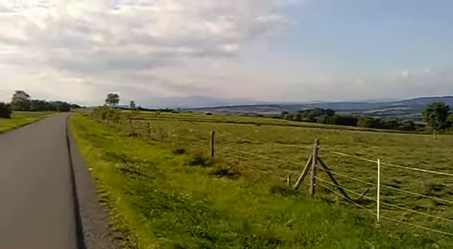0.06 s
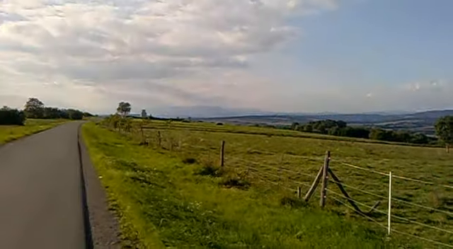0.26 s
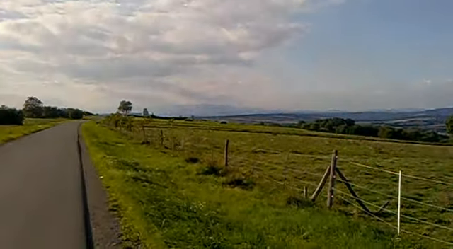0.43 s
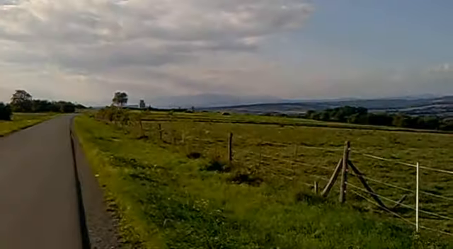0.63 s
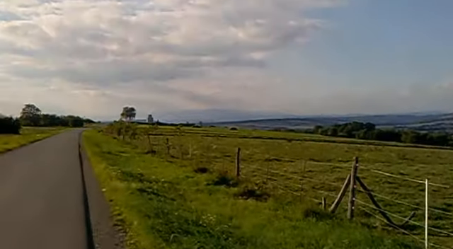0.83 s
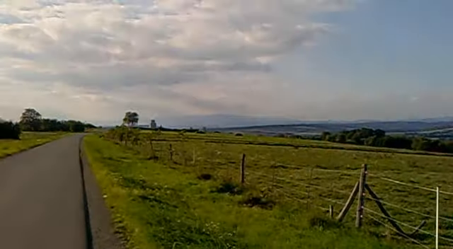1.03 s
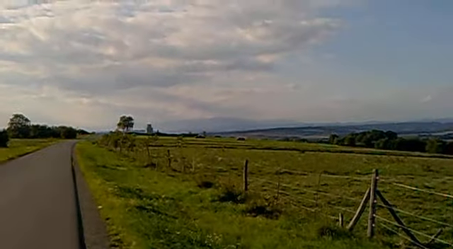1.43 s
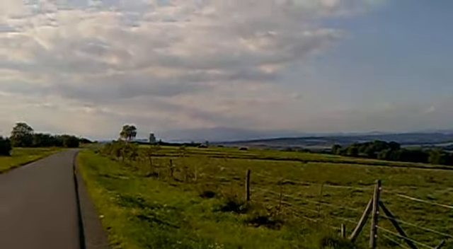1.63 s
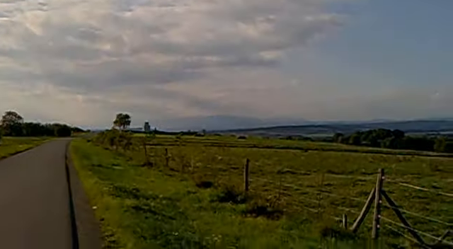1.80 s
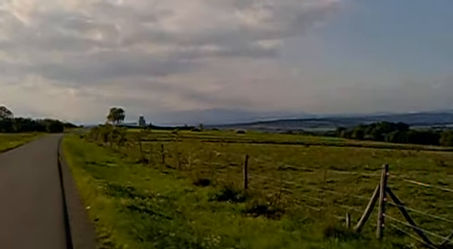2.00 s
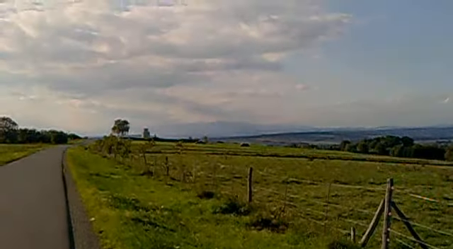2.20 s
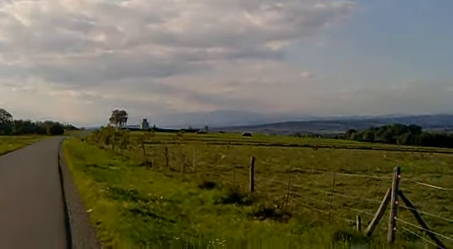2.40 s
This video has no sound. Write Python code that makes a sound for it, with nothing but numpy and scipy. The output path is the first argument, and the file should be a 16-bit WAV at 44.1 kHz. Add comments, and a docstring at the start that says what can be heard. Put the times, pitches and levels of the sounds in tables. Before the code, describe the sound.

Sharp ticks and dull knocks on a handheld microphone over low wind rumble.

```python
"""Beside a country road, wind buffets a hand-held microphone over the faint rush of open fields.
Turbulence at the microphone gives a deep rumble and, in strong gusts, a quicker flutter.
Small hard contacts close by, probably the casing being handled, give ringing ticks and dull knocks,
and sliding friction gives a few brief rubs. Each contact travels as a bending wave, which is
dispersive: its treble arrives a moment before its bass."""
import sys
import numpy as np
from scipy import signal
from scipy.fft import rfft, irfft
from scipy.io import wavfile
from scipy.ndimage import uniform_filter1d

SR = 44100
rng = np.random.default_rng(int(sys.argv[2]) if len(sys.argv) > 2 else 0)


def output_pcm(signal):
    """Save a mono or channel-first signal as 16-bit PCM at the path in sys.argv[1].

    Samples are clipped to [-1, 1] before scaling.
    """
    pcm = np.clip(np.atleast_2d(signal).T, -1, 1) * 32767
    wavfile.write(sys.argv[1], SR, np.round(pcm).astype(np.int16))


N = 112454


def from_db(db):
    """Amplitude ratio of a level in decibels."""
    return 10 ** (np.asarray(db) / 20)


def band(x, low_hz, high_hz, order=2):
    """Causal Butterworth band-pass."""
    high_hz = min(max(high_hz, low_hz + 10), SR / 2 - 10)
    return signal.sosfilt(signal.butter(order, [low_hz, high_hz], "band", fs=SR, output="sos"), x)


def resonate(x, modes, sign=-1):
    """Modal superposition: alternating signs fill the valleys between peaks, equal signs deepen them."""
    out = 0
    for k, (hz, width_hz, db) in enumerate(modes):
        radius = np.exp(-np.pi * width_hz / SR)
        feedback = [1, -2 * radius * np.cos(2 * np.pi * hz / SR), radius ** 2]
        mode = (1 - radius ** 2) / 2 * signal.lfilter([1, 0, -1], feedback, x)
        out = out + sign ** k * from_db(db) * mode
    return out


def noise(spectrum):
    """Spectral shaping: noise of rms 1 with the given colour, falling steeply above its last point."""
    hz, db = np.transpose(spectrum)
    f = np.maximum(np.fft.rfftfreq(N, 1 / SR), 1)
    gain = from_db(np.interp(np.log(f), np.log(hz), db)) / (1 + (f / hz[-1] / 2) ** 2) ** 2
    x = irfft(rfft(rng.standard_normal(N)) * gain, N)
    return x / x.std()


def eddies(spectrum, window_s=0.02):
    """Turbulence as noise divided by its running rms, so that the gusts alone set its envelope."""
    x = noise(spectrum)
    power = uniform_filter1d(abs(signal.hilbert(x)) ** 2 / 2, int(window_s * SR))
    return x / np.sqrt(power + 1e-9)


def wind():
    """Turbulent pressure on the microphone: a deep rumble, and a quicker flutter in strong gusts."""
    # gust envelopes: (time [s], relative rumble level [dB], relative flutter level [dB])
    gusts = [(0.0, -37.5, -69), (0.025, -51, -64.5), (0.09, -31, -36), (0.135, -48, -65),
             (0.158, -41, -34.5), (0.173, -20.5, -26), (0.209, -43.5, -60.5), (0.329, -37.5, -45.5),
             (0.339, -25, -33), (0.37, -25, -25), (0.408, -32, -31.5), (0.459, -41, -48),
             (0.551, -32.5, -52.5), (0.595, -29, -30.5), (0.613, -38, -63.5), (0.662, -32.5, -54),
             (0.695, -51.5, -50.5), (0.756, -30, -48), (0.816, -47.5, -63.5), (0.857, -38, -57.5),
             (0.901, -38.5, -68), (0.967, -50.5, -62), (1.001, -40.5, -61.5), (1.192, -44, -54),
             (1.235, -53.5, -65), (1.392, -37.5, -56), (1.42, -54.5, -60.5), (1.435, -36.5, -64.5),
             (1.489, -39.5, -39.5), (1.514, -32, -62.5), (1.564, -48, -73.5), (1.636, -35, -48),
             (1.697, -46.5, -69.5), (1.762, -35, -49.5), (1.828, -40.5, -56.5), (1.98, -48, -55),
             (2.071, -47, -49),(2.103, -37, -49.5), (2.18, -38.5, -42), (2.205, -47, -62),
             (2.372, -45, -49.5), (2.424, -37, -84), (2.442, -54.5, -56), (2.548, -45.5, -61.5)]
    # spectrum of the rumble: (frequency [Hz], relative density [dB])
    rumble_spectrum = [(15, -7), (28, 2.5), (45, 5), (80, 1), (115, -14), (170, -25.5), (300, -36.5)]
    # spectrum of the flutter: (frequency [Hz], relative density [dB])
    flutter_spectrum = [(70, -20), (120, 4.5), (160, 0), (230, -14), (350, -23.5), (600, -38.5),
                        (1200, -63.5)]
    times, rumble_db, flutter_db = np.transpose(gusts)
    t = np.arange(N) / SR
    rumble = from_db(np.interp(t, times, rumble_db) + 1) * eddies(rumble_spectrum)
    flutter = from_db(np.interp(t, times, flutter_db) - 1) * eddies(flutter_spectrum)
    return rumble + flutter


def fields(level_db=-68):
    """Stationary broadband noise: the far rush and hiss of open fields."""
    # ambient spectrum: (frequency [Hz], relative density [dB])
    spectrum = [(200, 9), (420, -5), (720, 7), (1050, -2.5), (1500, -7.5), (2200, -19), (4000, -18.5),
                (10000, -16.5), (16000, -11.5)]
    return from_db(level_db) * noise(spectrum)


def rubs():
    """Sliding friction: a grumble grows with speed, a hiss and the casing's modes with its square."""
    # slides: (start [s], swell [s], fade [s], peak grumble [dB], peak hiss [dB], peak sheen [dB])
    slides = [(0.051, 0.0066, 0.062, -56, -53, -65), (.07, 0.063, 0.19, -67, -69.5, -80),
              (0.214, 0.075, 0.018, -41, -54.5, -80), (1.271, 0.024, 0.065, -62, -61, -88.5)]
    # low friction noise: (frequency [Hz], relative density [dB])
    grumble_spectrum = [(120, -5.5), (300, 0), (480, 3), (900, -3.5), (1600, -22), (3000, -30.5)]
    # high friction noise: (frequency [Hz], relative density [dB])
    hiss_spectrum = [(1000, 0), (1600, 0.5), (3500, -6.5), (5000, -11), (7000, -14.5), (10000, -16.5),
                     (15000, -24)]
    # modes driven by friction: (frequency [Hz], bandwidth [Hz], relative gain [dB])
    sheen_modes = [(1560, 320, -1), (4740, 250, 6.5), (6500, 540, 3.5), (9100, 700, -24),
                   (12900, 2000, -22)]
    grumble, hiss = noise(grumble_spectrum), noise(hiss_spectrum)
    sheen = resonate(rng.standard_normal(N), sheen_modes, sign=1)
    sheen /= sheen.std()
    t = np.arange(N) / SR
    out = np.zeros(N)
    for start, swell, fade, grumble_db, hiss_db, sheen_db in slides:
        speed = np.interp(t, [start, start + swell, start + swell + fade], [0, 1, 0])
        out += speed * from_db(grumble_db) * grumble
        out += speed ** 2 * (from_db(hiss_db) * hiss + from_db(sheen_db) * sheen)
    return out


def contact_force(size, crunch_s, snap_db=-1, grit_db=-6, ripple_hz=1090):
    """Force spectrum of an impact: one clean impulse superposed on a crunch of tiny slips."""
    f = np.fft.rfftfreq(size, 1 / SR)
    age = np.arange(size) / SR / crunch_s
    slips = rfft(rng.standard_normal(size) * age * np.exp(-2 * age ** 2))
    # whitening leaves only spectral ripples finer than ripple_hz
    slips /= np.sqrt(uniform_filter1d(abs(slips) ** 2, int(ripple_hz / f[1])))
    snap = np.exp(-1j * np.pi * f * crunch_s)   # falls at the peak of the crunch
    return from_db(snap_db) * snap + from_db(grit_db) * slips


def contact(start, body, crack_db, crack_hz, sparkle_db, crunch_s, *hollows_hz):
    """Bending-wave dispersion: body sound, crack and high modes arrive with a delay ~ 1 / sqrt(f)."""
    # high modes of the casing: (frequency [Hz], bandwidth [Hz], relative gain [dB])
    sparkle_modes = [(5326, 450, -9), (6637, 400, -5), (8050, 350, -2.5), (8860, 948, 2), (12640, 860, -8)]
    crack_spread, delay_at_1khz_s, lead_samples = 1.375, 0.0018, 256
    hollow_relative_width, hollow_db = 0.15, -20.5
    click = signal.unit_impulse(len(body))
    crack = from_db(crack_db) * band(click, crack_hz / crack_spread, crack_hz * crack_spread)
    sparkle = from_db(sparkle_db) * resonate(click, sparkle_modes, sign=1)
    spectrum = rfft(body) + contact_force(len(body), crunch_s) * rfft(crack + sparkle)
    f = np.fft.rfftfreq(len(body), 1 / SR)
    dispersion = np.exp(-4j * np.pi * delay_at_1khz_s * np.sqrt(1000 * f))
    sound = np.roll(irfft(spectrum * dispersion), lead_samples)
    for hz in hollows_hz:   # modes with a node at the touched spot stay silent, leaving a hollow
        sound -= (1 - from_db(hollow_db)) * resonate(sound, [(hz, hz * hollow_relative_width, 0)])
    return np.pad(sound, (int(start * SR), N))[lead_samples:lead_samples + N]


def casing_ring(size=4096, low_cut_hz=515):
    """Impulse response of the casing's low modes, a sum of damped oscillations."""
    # low modes: (frequency [Hz], bandwidth [Hz], relative gain [dB])
    modes = [(659, 112, 5), (911, 218, -0.5), (1351, 220, -3.5), (1910, 454, -15.5)]
    ring = resonate(signal.unit_impulse(size), modes)
    return signal.sosfilt(signal.butter(2, low_cut_hz, "high", fs=SR, output="sos"), ring)


def ticks(ring):
    """Impulsive excitation: each hard tap sets the low modes ringing freely."""
    # taps: (time [s], ring gain [dB], crack gain [dB], crack centre [Hz], sparkle gain [dB],
    # crunch length [s], low hollow [Hz], high hollow [Hz])
    taps = [(0.055, -1, -11.5, 2400, -51, 0.00072, 1850, 3620),
            (0.1046, -22.5, -40, 3060, -48, 0.0016, 1880, 3800),
            (0.4416, 3, 9.5, 3913, -1, 0.00046, 1860, 6144),
            (0.7142, 4, -12.5, 2120, -49, 0.0011, 2500, 3520),
            (1.0416, 0, -2.5, 2660, -17.5, .00052, 920, 3680),
            (1.318, 4.5, -19.5, 3100, -45, .0015, 2760, 6040),
            (1.806, -1, -6.5, 2860, -26, 0.001444, 1580, 3720),
            (1.9955, -1, -28.5, 4040, -49.5, 0.00055, 2610, 5660),
            (2.3476, 2.5, -0.5, 2740, -27, 0.00045, 1550, 3920)]
    return sum(contact(start, from_db(db) * ring, *timbre) for start, db, *timbre in taps)


def knocks(ring, lag_s=0.00059, ring_db=-23.5):
    """Heavy damping: the casing gives way just after the crack in a dead thump that barely rings."""
    # blows: (time [s], thump gain [dB], crack gain [dB], crack centre [Hz], sparkle gain [dB],
    # crunch length [s], low hollow [Hz], high hollow [Hz])
    blows = [(0.14, -2, -35.5, 2920, -39, 0.0031, 1850, 6000),
             (0.193, 4, -21, 2840, -35, .0035, 1790, 6130),
             (0.228, -1, -23, 2690, -41, 0.00142, 1910, 6000),
             (0.4361, 15, -9.5, 4180, -17, .001, 1850, 7100),
             (0.501, 11, -8.5, 3130, -32, 0.0013, 1800, 6200),
             (1.0406, 15.5, -6, 4470, -20.5, .0011, 1057, 3880),
             (1.0862, 13, -12, 3450, -30.5, 0.00067, 1770, 4300)]
    push = signal.unit_impulse(len(ring), int(lag_s * SR))
    thump = band(push, low_hz=163, high_hz=620) + from_db(ring_db) * ring
    return sum(contact(start, from_db(db) * thump, *timbre) for start, db, *timbre in blows)


def shiver(contacts, t60_s=0.06):
    """Diffuse decay: each octave's energy dies away as faint noise, so dull contacts leave dull tails."""
    # tail by octave: (centre frequency [Hz], level relative to the contacts in that octave [dB])
    octaves = [(350, -22.5), (700, -16.5), (1400, -15), (2800, -20), (5600, -24.5), (11200, -24)]
    decay = from_db(-60 * np.arange(SR // 5) / SR / t60_s) ** 2
    out = np.zeros(N)
    for hz, db in octaves:
        edges = hz / np.sqrt(2), hz * np.sqrt(2)
        power = band(contacts, *edges, order=3) ** 2
        tail_power = abs(signal.fftconvolve(power, decay / decay.sum())[:N])
        hiss = band(rng.standard_normal(N), *edges, order=3)
        out += from_db(db) * np.sqrt(tail_power) * hiss / hiss.std()
    return out


def scene():
    """Superposition of contacts, rubs, wind and the far rush of the fields in one channel."""
    ring = casing_ring()
    contacts = ticks(ring) + knocks(ring)
    return (contacts + shiver(contacts) + rubs() + wind() + fields())[None]


def record(dry, cutoff_hz=16200):
    """Band limiting: a steep elliptic low-pass removes the highest treble."""
    return signal.sosfilt(signal.ellip(10, .2, 80, cutoff_hz, fs=SR, output="sos"), dry)


dry = scene()
out = record(dry)
output_pcm(out)
```